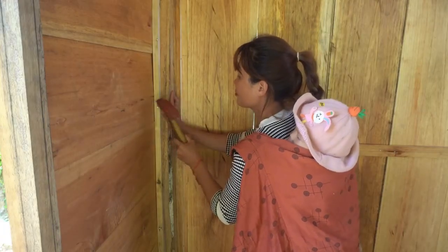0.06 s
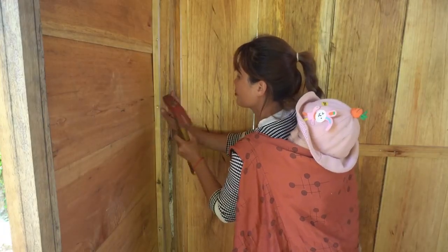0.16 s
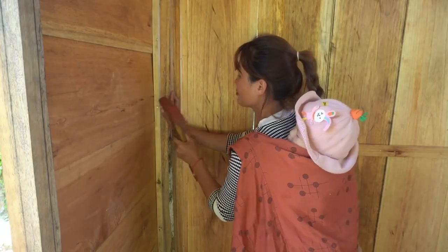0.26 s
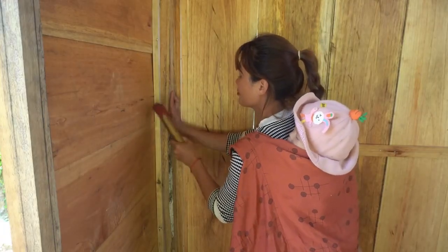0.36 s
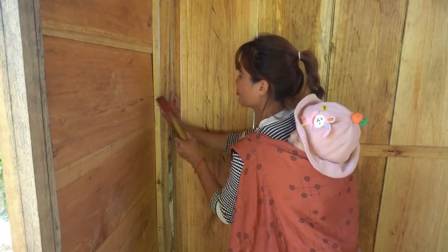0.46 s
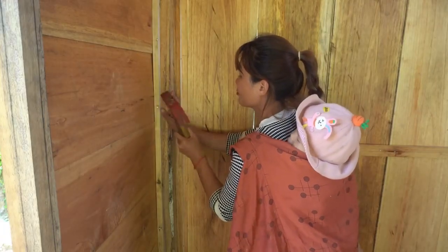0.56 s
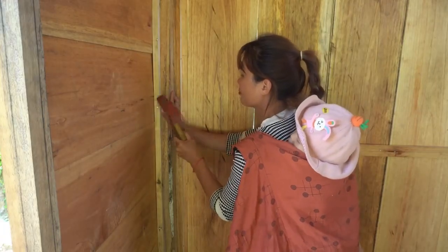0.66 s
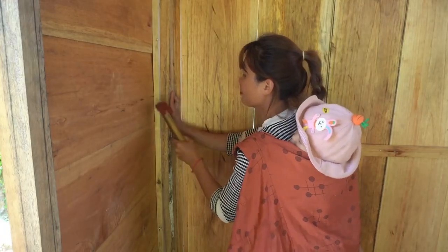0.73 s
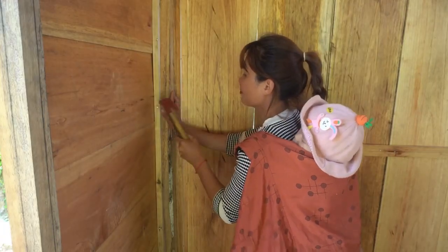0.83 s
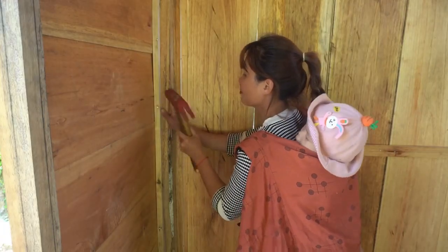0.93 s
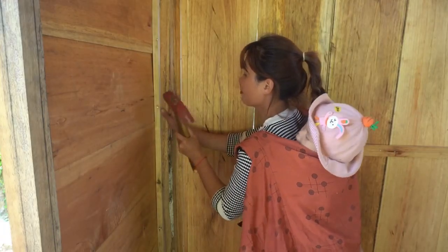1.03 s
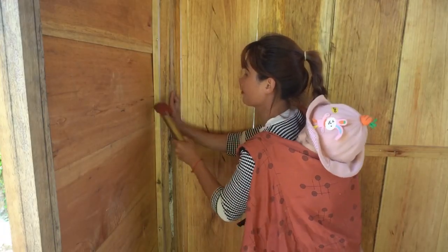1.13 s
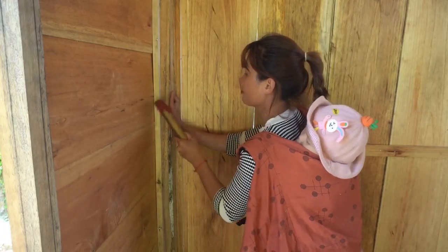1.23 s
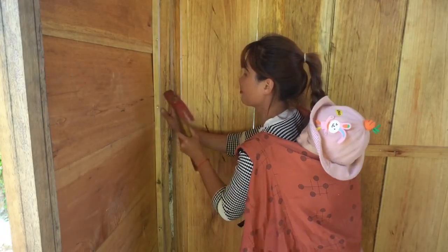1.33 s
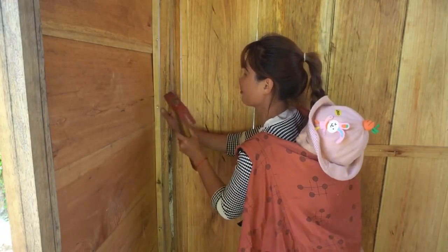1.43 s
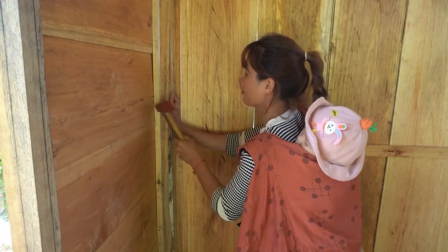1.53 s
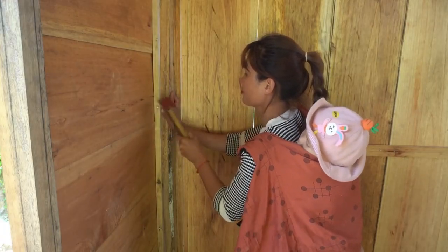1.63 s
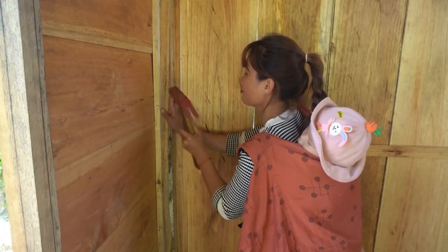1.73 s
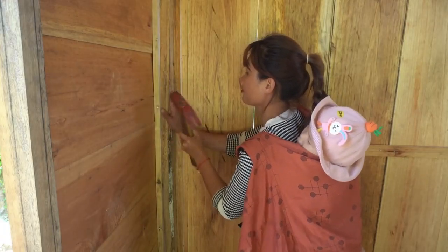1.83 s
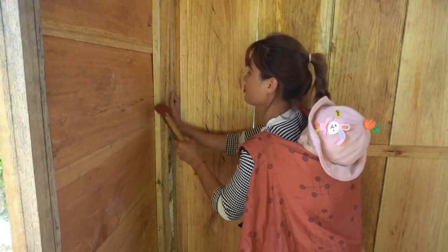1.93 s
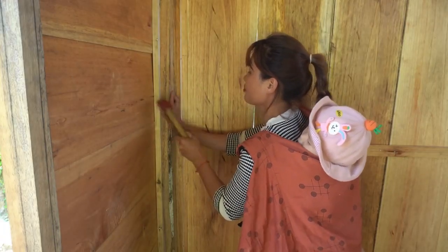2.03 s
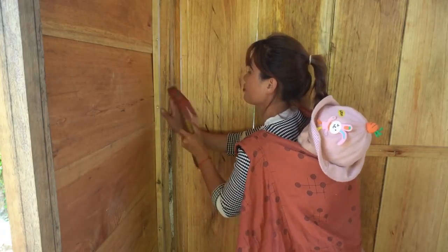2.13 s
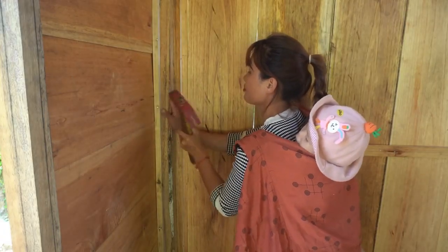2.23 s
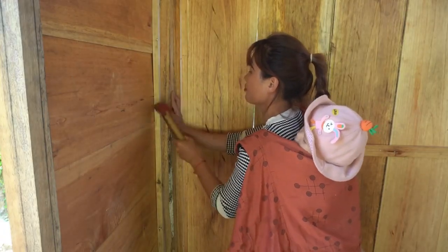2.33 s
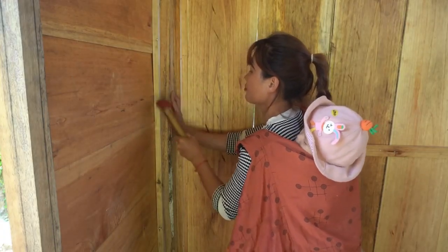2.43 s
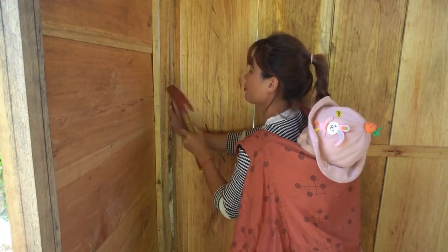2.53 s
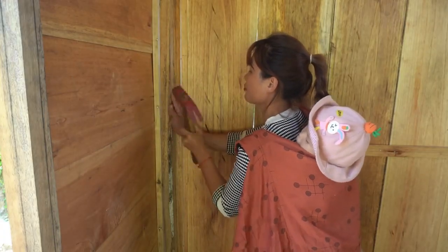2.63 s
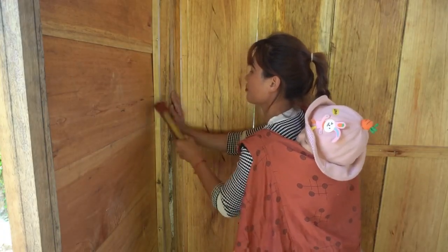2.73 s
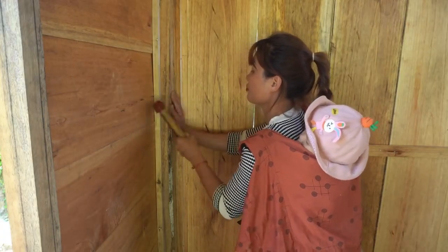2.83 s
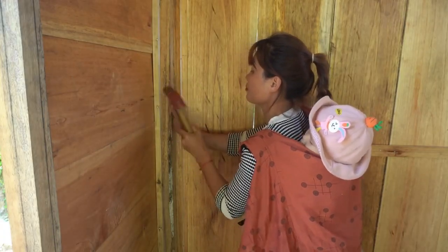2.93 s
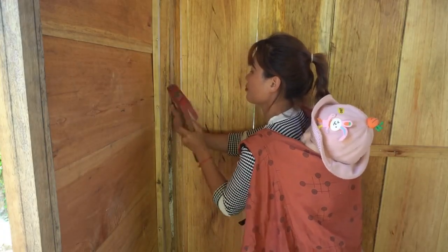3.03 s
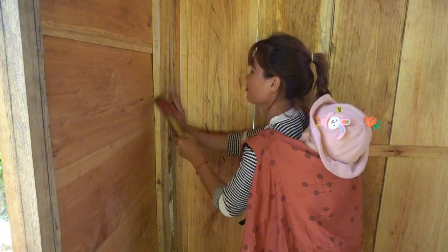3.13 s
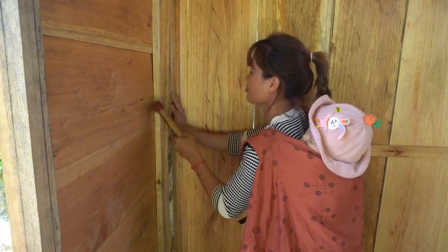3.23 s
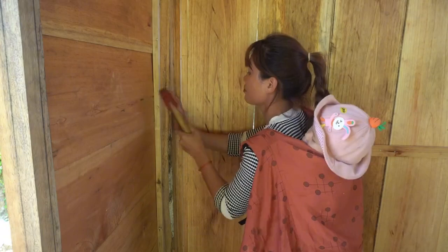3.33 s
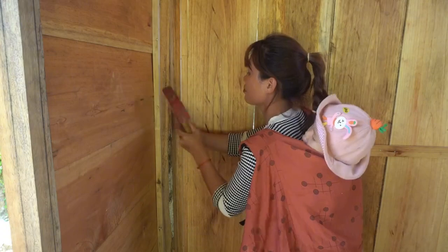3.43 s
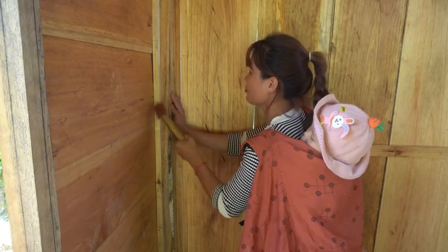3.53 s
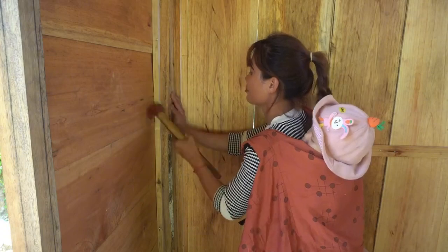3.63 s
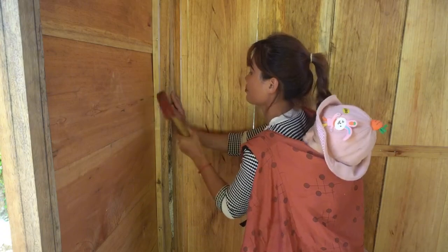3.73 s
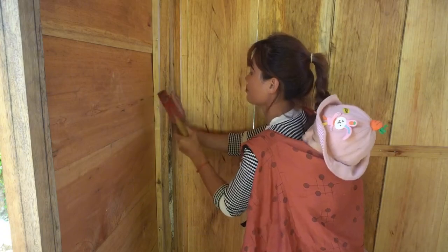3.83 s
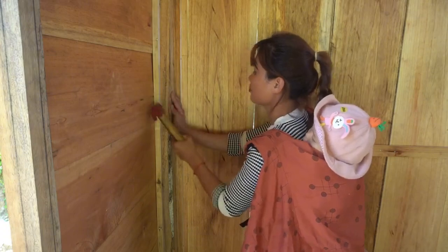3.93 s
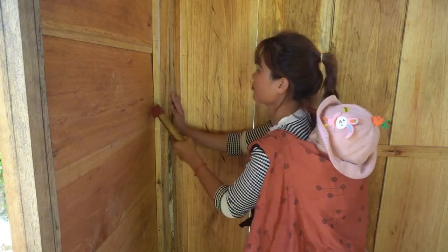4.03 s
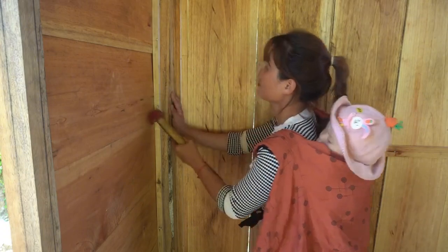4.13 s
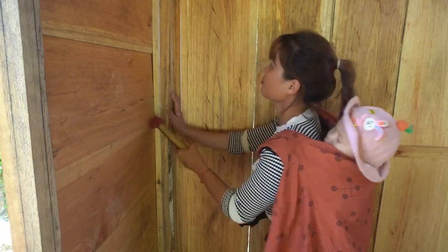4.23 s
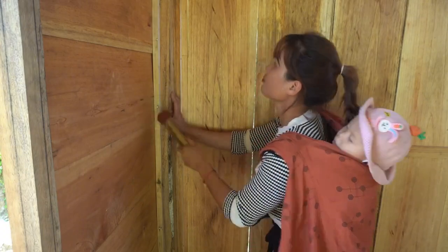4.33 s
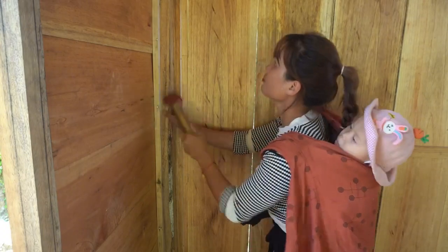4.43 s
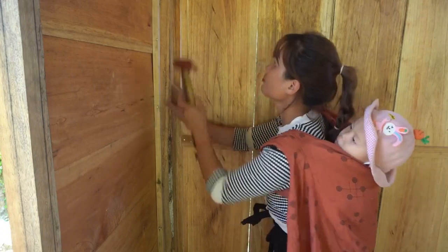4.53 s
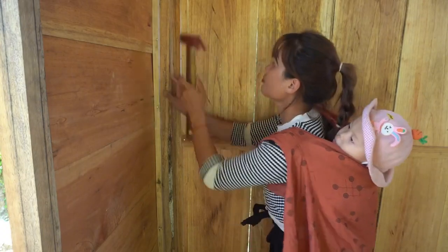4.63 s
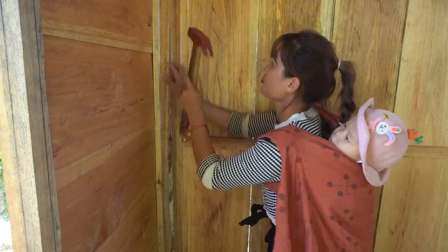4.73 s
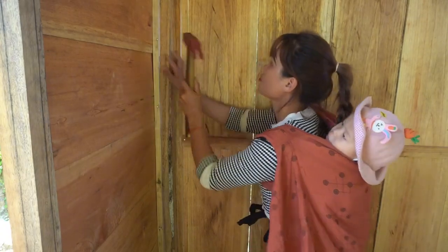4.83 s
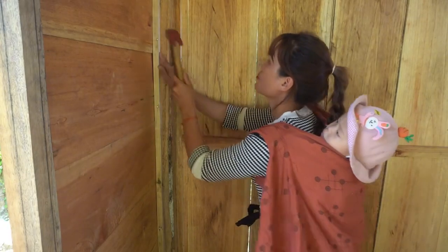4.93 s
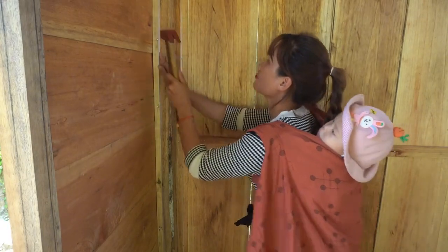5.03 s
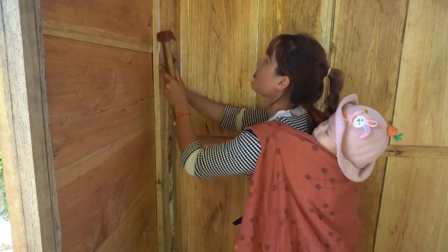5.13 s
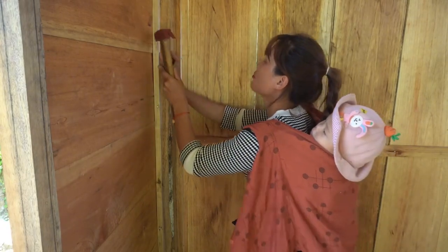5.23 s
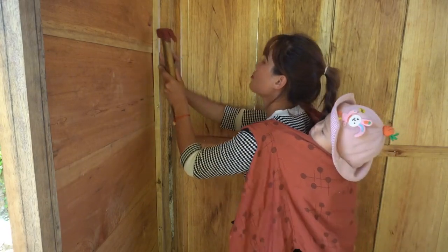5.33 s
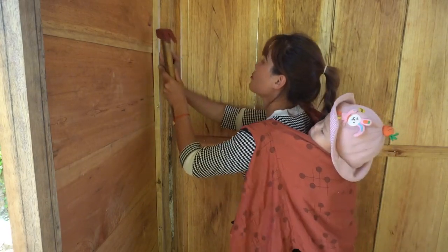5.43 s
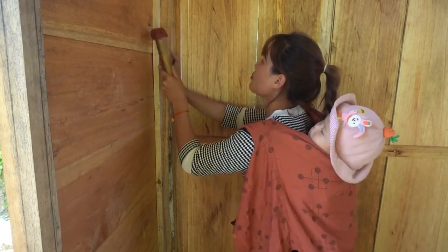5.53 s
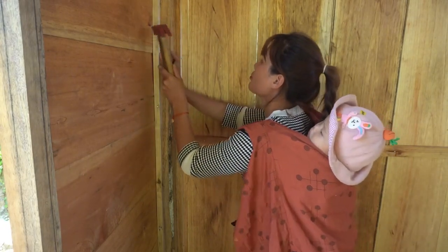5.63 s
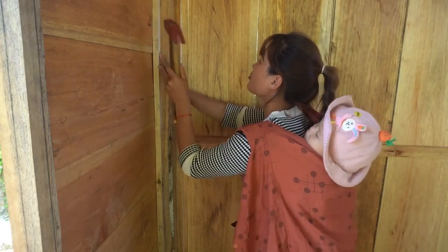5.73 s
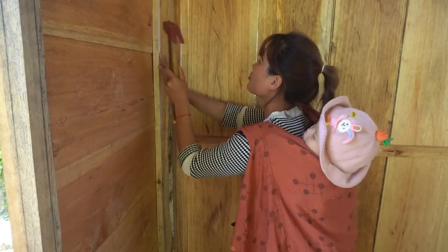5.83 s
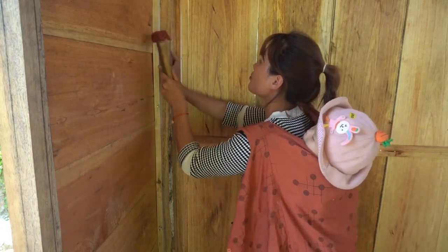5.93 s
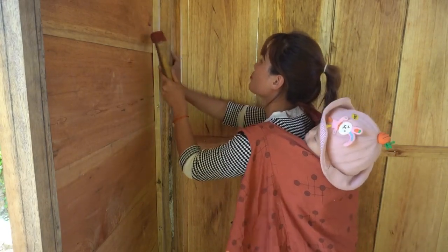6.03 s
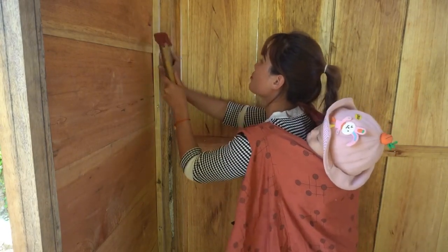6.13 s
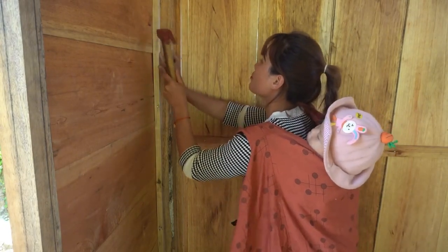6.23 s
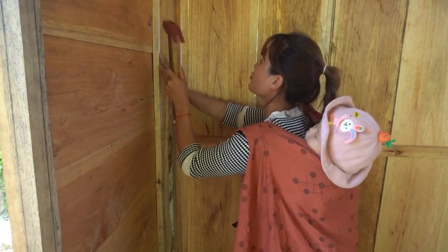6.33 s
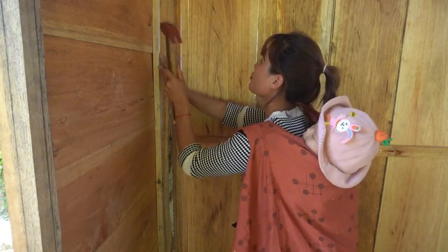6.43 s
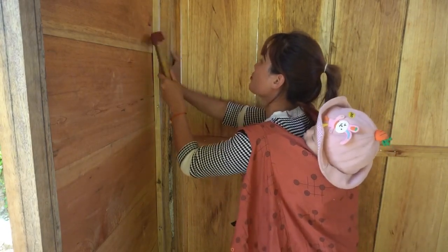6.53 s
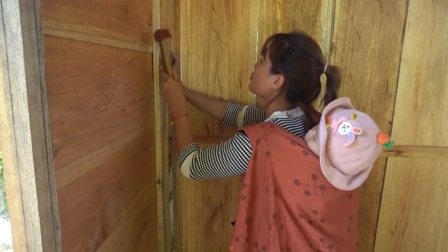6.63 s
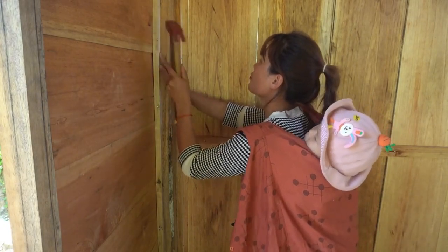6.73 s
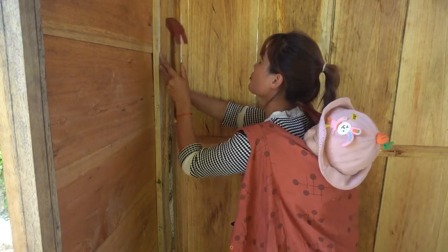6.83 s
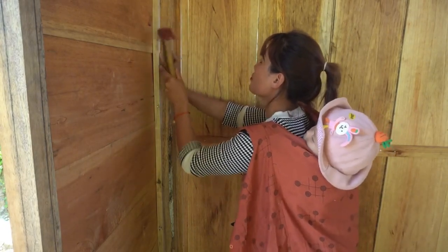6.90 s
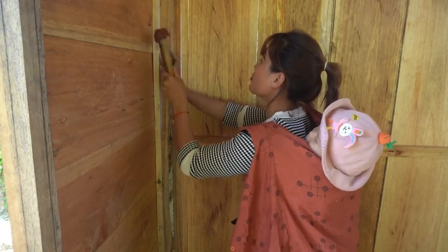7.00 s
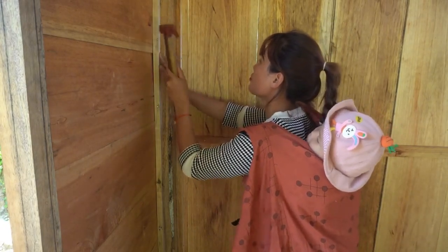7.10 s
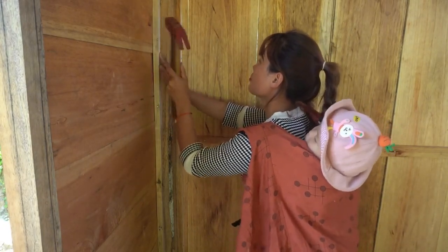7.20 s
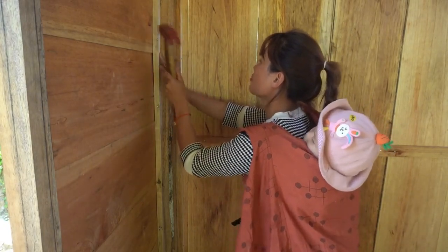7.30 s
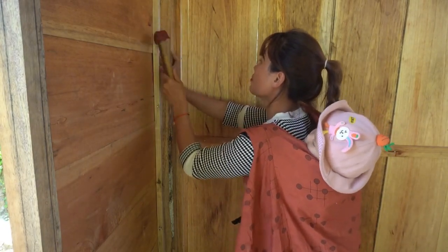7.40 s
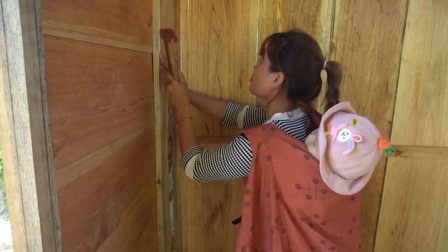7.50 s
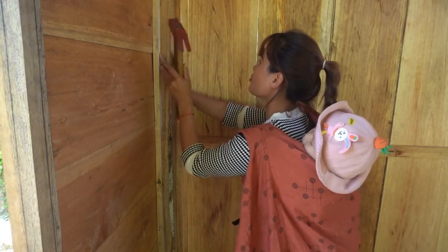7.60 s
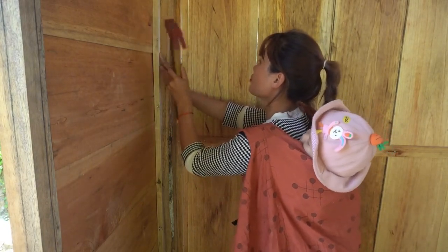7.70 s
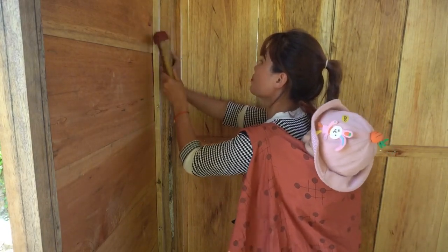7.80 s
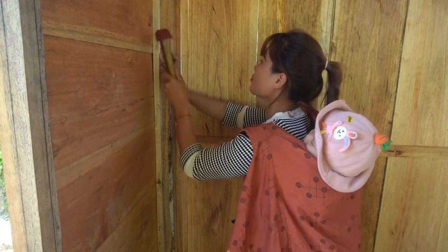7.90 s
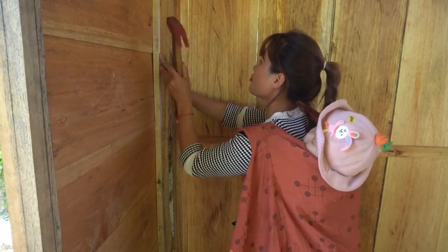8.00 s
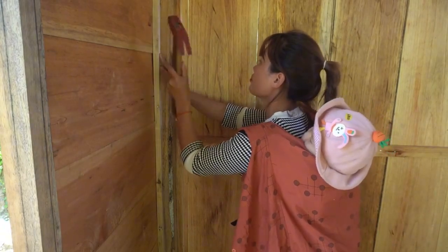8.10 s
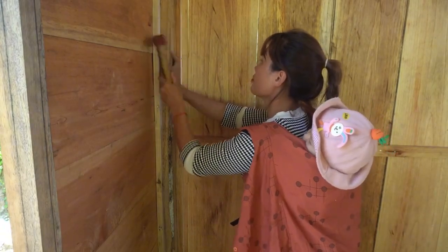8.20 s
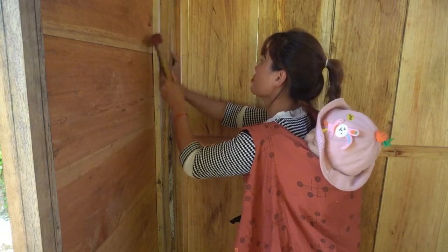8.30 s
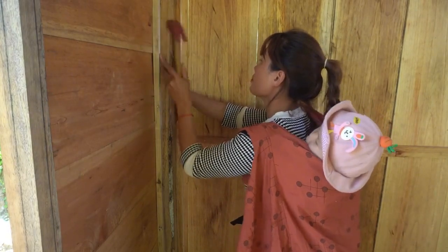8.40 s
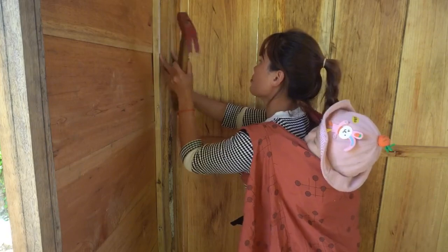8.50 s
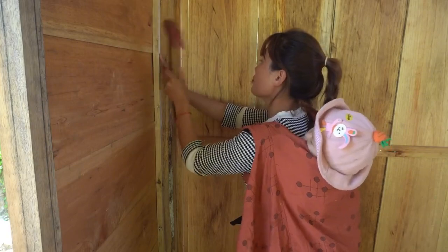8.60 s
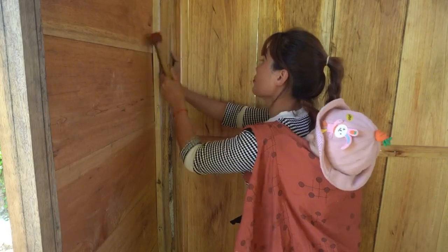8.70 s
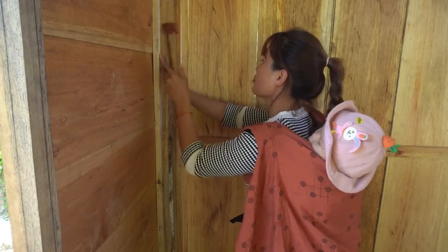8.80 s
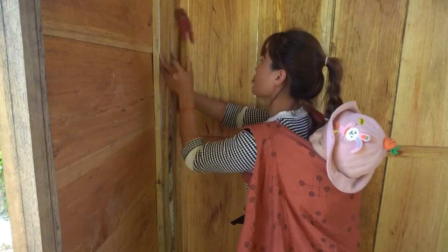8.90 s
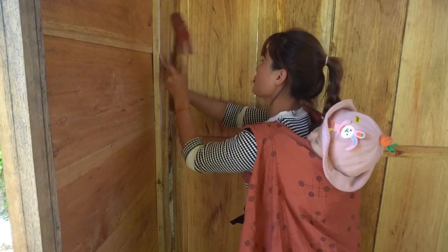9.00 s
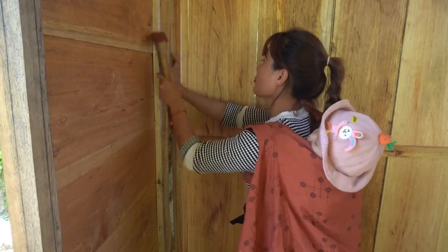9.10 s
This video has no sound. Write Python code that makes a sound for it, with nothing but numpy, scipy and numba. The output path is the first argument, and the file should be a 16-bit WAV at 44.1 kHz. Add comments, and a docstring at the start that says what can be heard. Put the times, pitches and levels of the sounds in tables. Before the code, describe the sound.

A hammer drives nails into a wooden strip on a plank wall, heard close in stereo inside an empty wooden house. From 0 to 4 seconds, firm blows fall about every 0.4 seconds: a sharp steel-on-nail crack, short woody knock, low board boom and brief boxy room answer, with faint high ringing from the hammer head. The blows near 2.8, 3.2 and 3.95 seconds bounce into a quick second hit. Soft low bumps follow at 4.1 and 4.25, then a near pause; a thin steel scrape comes at 4.9. At 5.2 a fresh, loose nail is struck, weaker, duller and rattling, firming by about 7. Blows continue every 0.4 to 0.6 seconds to just past 9, several rebounding, the last more thud than crack. A quiet water-like outdoor rush runs throughout, pushed down by loud hits, above barely audible low air rumble.

```python
"""A hammer drives nails into a strip on a plank wall inside an empty wooden house.
Steady blows come first: noise for the crack and the room, fading sine waves for strip, planks and steel head.
The hammer then bumps softly to rest, touches the steel, and strikes a fresh, loose nail that soon grips.
Some blows bounce and land again. Filtered noise makes a rush like running water outdoors all along.
An automatic gain control turns the sound down while it is loud."""
import sys
import numpy as np
from scipy import signal
from scipy.fft import rfft, irfft, next_fast_len
from scipy.io import wavfile
from scipy.ndimage import uniform_filter1d, map_coordinates
from numba import njit

SR = 44100
rng = np.random.default_rng(int(sys.argv[2]) if len(sys.argv) > 2 else 0)


def to_wav(sig):
    """Store sig (one row per channel, or 1-D mono) as 16-bit WAV at the path in sys.argv[1].

    Samples outside -1..1 are clipped; the rate is SR.
    """
    pcm = np.clip(np.atleast_2d(sig), -1, 1) * 32767
    pcm = np.round(pcm).astype(np.int16)
    wavfile.write(sys.argv[1], SR, pcm.T)  # frames by channels


N = 403515  # length in samples

# Swung blows. Each row: start in seconds, crack of steel on the nail in dB, answer of the wood in dB,
# ring of the hammer head in dB.
SWUNG_BLOWS = [(-0.055, -.5, -1.5, -49), (0.348, 0, -3.5, -45), (0.746, 0, -2.5, -30),
               (1.159, 0.5, -3, -35), (1.555, -1, -2, -31), (1.964, 0, -3, -37), (2.365, 1.5, 1.5, -23.5),
               (2.786, 5, 2.5, -22.5), (3.207, 1, -0.5, -33.5), (3.585, -0.5, 1.5, -57),
               (3.948, 2, 4.5, -43), (5.224, -5, -9.5, -60), (5.524, -3, -4.5, -55), (5.942, 1, -3, -55),
               (6.53, -2, -2.5, -50), (6.958, -2, 2.5, -39), (7.376, -1, 1.5, -41), (7.81, -7, 2.5, -24),
               (8.253, 0.5, 1.5, -29), (8.7, 1.5, 1, -26), (9.134, -20.5, 3.5, -35)]
# The head bounces and lands again. Each row: start in seconds, crack in dB, answer of the wood in dB.
SECOND_LANDINGS = [(2.809, -5, -5), (3.251, -8, -8.5), (4.002, 11, -1.5), (7.003, 2, -8.5),
                   (8.279, -1, -10), (8.725, 0, -7)]
# Light touches of the steel as the next nail is set. Each row: start in seconds, level in dB,
# time to the peak in seconds.
STEEL_TOUCHES = [(4.921, -23.5, 0.0014), (4.926, -23.5, 0.0055)]
# Soft bumps on the wall as the hammer comes to rest. Each row: start in seconds, level in dB.
SOFT_BUMPS = [(4.13, -28), (4.255, -35)]
# Tone colour of the crack. Each row: frequency in Hz, relative level per Hz in dB.
CRACK_COLOUR = [(180, -32), (300, -8), (772, -46), (1470, 5), (2740, 8.5), (3160, -58), (3830, 3),
                (10900, -11), (13800, -23)]
# Ways the nailed strip vibrates. Each row: central frequency in Hz, central level in dB,
# time to fall 60 dB in seconds.
STRIP_MODES = [(585, -8.5, 0.047), (713, -8, 0.17), (753, -21, 0.091), (812, 2, 0.032), (1023, -5.5, 0.092),
               (1140, -6.5, 0.14), (1228, 3.5, 0.037), (1406, -3, 0.1), (1427, -9.5, 0.16), (1798, 9, 0.06),
               (1990, 4, 0.097), (2174, 10, 0.033), (2777, -6, 0.13), (3060, -8, 0.084), (3634, -10, 0.053),
               (3660, -9.5, 0.2)]
# Low vibrations of wall and room. Each row: frequency in Hz, central level in dB,
# time to fall 60 dB in seconds, first swing of the boards as 1 or -1.
PLANK_MODES = [(59.7, -18, 1.15, 1), (73, -9, .75, 1), (78, -17, 1.05, 1), (89, -16, .78, -1),
               (95.9, -2, .25, -1), (108.3, -12, .8, -1), (120.8, -9, .75, 1), (128.8, -2, .45, -1),
               (145.2, -13, .6, -1), (171.3, -18, .45, 1), (188.2, -16, .5, -1), (205.5, -12, .5, -1),
               (231.4, -10, .28, 1), (251.5, -4, .22, 1), (275.1, -16, .32, -1), (289.8, -14, .3, 1)]
# Higher vibrations of single boards. Each row: frequency in Hz, central level in dB,
# time to fall 60 dB in seconds.
BOARD_MODES = [(155, -29, 1), (322.6, -9, 0.35), (441, -29, 0.6), (449, -3.5, 0.19), (527, -38, 0.3),
               (554, -16, 0.33)]
# Tone colour of the room's answer. Each row: frequency in Hz, relative level per Hz in dB.
ROOM_COLOUR = [(150, -2), (280, -4.5), (490, -6), (700, -2.5), (1000, 1), (1270, 4), (1560, -1.5),
               (2200, -4.5), (2760, -9), (5000, -16.5), (8000, -25.5), (12100, -30.5), (13100, -41)]
# How the near room dies. Each row: frequency in Hz, time to fall 60 dB in seconds,
# time constant of filling in seconds.
ROOM_DECAY = [(258, 0.3053, 0.038), (1050, 0.1757, 0.047), (2710, 0.2646, 0.0014), (6540, 0.2352, 0.011),
              (12700, 0.22, 0.012)]
# Stereo width of the hammer's noises and room. Each row: frequency in Hz, side minus middle in dB.
HAMMER_WIDTH = [(60, -52.5), (110, -61), (200, -85), (360, -22.5), (660, -13), (1210, -7), (2210, -6.5),
                (4020, -3), (7330, -0.5), (13400, -5)]
# Tone colour of a steel touch. Each row: frequency in Hz, relative level per Hz in dB.
TOUCH_COLOUR = [(350, -42), (600, -14), (1400, -6.5), (1750, -6), (2260, -1.5), (4190, -9.5), (13000, -39)]
# Tone colour of the outdoor rush. Each row: frequency in Hz, relative level per Hz in dB.
RUSH_COLOUR = [(15, 3), (40, -49), (75, -47.5), (150, -8.5), (400, -11.5), (662, 2.5), (885, 1),
               (1150, 0.5), (2170, -3), (2700, -8), (4440, -18), (5200, -24.5), (10900, -37), (13000, -46)]
# Stereo width of the rush. Each row: frequency in Hz, side minus middle in dB.
RUSH_WIDTH = [(60, 15.5), (110, -25), (200, -28), (360, -1.5), (660, -14), (1210, -4), (2210, -4.5),
              (4020, -1.5), (7330, 2), (13400, -4)]
# Loudness of the rush over time. Each row: time in seconds, level in dB.
RUSH_LOUDNESS = [(0.0, -40.5), (0.53, -43), (4.3, -47), (5.09, -42), (5.43, -44.5), (8.2, -43),
                 (9.15, -41.5)]
# Air stirring at the microphone. Each row: frequency in Hz, relative level per Hz in dB.
RUMBLE_COLOUR = [(10, -18), (30, 0), (50, 0), (80, -23)]

HEAD_HZ, HEAD_T60 = 6562, 0.41  # ring of the steel head: Hz, seconds to fall 60 dB
HEAD_WAVER_DB, HEAD_WAVER_S = 5, 0.0202  # the ring flutters in the hand: depth, spacing of random points
KNOCK_DB, BOOM_DB = -14.5, -8  # strip against the wood's answer; boom of a full blow on a firm, lower nail
BODY_DB, BRIGHT_DB = 6.5, 1.12  # firm full blow: dB per octave under and over 1.5 kHz
NEW_NAIL_S, GRIP_S = 5.224, 0.71  # first blow on the fresh nail; time constant with which it grips
LOOSE_KNOCK_DB, LOOSE_BOOM_DB = 13, -15.5  # what a wholly loose nail adds
LOOSE_BODY_DB, LOOSE_BRIGHT_DB = -1.5, -8  # the same for colour, dB per octave
UPPER_BOOM_DB = 1.5  # the fresh nail sits higher, where the wall swings more freely
REBOUND_BODY_DB, REBOUND_BRIGHT_DB = 9, -7.5  # dB per octave
REBOUND_KNOCK_DB, REBOUND_BOOM_DB = -2, -8  # against the wood's answer
TOP_HZ = 14000  # nothing is left from here up


def hammer():
    """All blows, second landings, steel touches and soft bumps, each set in its place in time."""
    t = np.arange(SR) / SR
    events = [(start, full_blow(start, *levels)) for start, *levels in SWUNG_BLOWS]
    events += [(start, rebound(*levels)) for start, *levels in SECOND_LANDINGS]
    events += [(start, touch(*settings)) for start, *settings in STEEL_TOUCHES]
    events += [(start, amp(db) * np.tile(planks(t), reps=(2, 1))) for start, db in SOFT_BUMPS]
    return place(events)


def full_blow(start, crack_db, wood_db, ring_db):
    """A swung blow; on a loose nail the strip rattles, the wall booms less and the sound is dull."""
    upper = start > NEW_NAIL_S - .1
    loose = np.exp(-(start - NEW_NAIL_S) / GRIP_S) * upper  # 1 is loose, 0 is firm
    knock_db = wood_db + KNOCK_DB + loose * LOOSE_KNOCK_DB
    boom_db = BOOM_DB + upper * UPPER_BOOM_DB + loose * LOOSE_BOOM_DB
    body_db = BODY_DB + loose * LOOSE_BODY_DB
    bright_db = BRIGHT_DB + loose * LOOSE_BRIGHT_DB
    return blow(crack_db, knock_db, boom_db, wood_db, body_db, bright_db) + head(ring_db)


def rebound(crack_db, wood_db):
    """A second landing, dull and woody: the treble is weak and the low tones are strong."""
    knock_db, boom_db = wood_db + REBOUND_KNOCK_DB, wood_db + REBOUND_BOOM_DB
    return blow(crack_db, knock_db, boom_db, wood_db, REBOUND_BODY_DB, REBOUND_BRIGHT_DB)


def blow(crack_db, knock_db, boom_db, room_db, body_db, bright_db):
    """Crack of steel on the nail, knock of the strip, boom of the wall and answer of the room."""
    t = np.arange(SR) / SR
    crack = amp(crack_db - 60 * t / .012) * noise(SR, CRACK_COLOUR, HAMMER_WIDTH, body_db, bright_db)
    knock = amp(knock_db) * strip(t, body_db, bright_db)
    boom = amp(boom_db) * planks(t)
    room_noise = noise(SR, ROOM_COLOUR, HAMMER_WIDTH, body_db, bright_db)
    room = amp(room_db) * fading(room_noise, far_db=-37.0)
    contact = 1 - np.exp(-(t / .001) ** 3)  # the sound sets in over about a millisecond
    # the push itself, a few quick swings
    push_shape = np.exp(-((t - .0014) / 0.0011) ** 2)
    push = amp(crack_db - 3.0) * push_shape * np.sin(2 * np.pi * 1400 * t)
    return push + contact * (crack + knock + room + boom)


def strip(t, body_db, bright_db):
    """The strip vibrates at many pitches that die away, a little different at each blow."""
    hz, db, t60 = np.transpose(STRIP_MODES)[:, :, None]
    detune, scatter = rng.standard_normal((2, len(hz), 1))
    level = amp(db + lean(hz, body_db, bright_db) + 3.5 * scatter - 60 * t / t60)
    return (level * np.sin(2 * np.pi * hz * (1 + 0.0183 * detune) * t)).sum(0)


def planks(t):
    """The planks first swing the same way at every blow, so the boom beats in much the same pattern."""
    boards = [(*mode, (-1) ** k) for k, mode in enumerate(BOARD_MODES)]  # swings alternate
    hz, db, t60, swing = np.transpose(list(PLANK_MODES) + boards)[:, :, None]
    scatter_db = .8 * rng.standard_normal(hz.shape)
    level = swing * amp(db + scatter_db - 60 * t / t60)
    late = np.maximum(t - .002, 0)  # the swing starts 2 ms after the blow
    rise = 1 - np.exp(-t / .016)
    return (level * np.sin(2 * np.pi * hz * late)).sum(0) * rise


def head(ring_db):
    """The steel head rings; two close modes beat, so the ring swells late, and it flutters."""
    t = np.arange(SR) / SR
    waver = map_coordinates(rng.standard_normal(200), [t / HEAD_WAVER_S])
    level = amp(ring_db - 60 * t / HEAD_T60 + HEAD_WAVER_DB * waver)
    beat = np.sin(np.pi * 1.8 * t)  # modes 1.8 Hz apart
    return level * beat * np.sin(2 * np.pi * HEAD_HZ * t)


def touch(db, peak_s):
    """A thin, bright scrape that swells and fades, and its echo in the room."""
    u = np.arange(SR) / SR / peak_s
    scrape = u * np.exp(1 - u) * noise(SR, TOUCH_COLOUR, HAMMER_WIDTH)
    echo = amp(-11.5) * fading(noise(SR, TOUCH_COLOUR, HAMMER_WIDTH), far_db=-45)
    return amp(db) * (scrape + echo)


def fading(x, far_db):
    """Each pitch fills the room and dies in lumps, ever faster; the rest of the house answers weak and long."""
    hz, t, z = signal.stft(x, SR, nperseg=256)
    t60 = along(ROOM_DECAY, hz)[:, None]
    fill = along(ROOM_DECAY, hz, column=2)[:, None]
    lumps = smooth_field(z.shape[1:], hz_bins=8, frames=2)
    near = amp(-60 * (t / t60) ** 1.4)
    far = amp(far_db - 60 * t / (4.3 * t60))
    shape = (1 - np.exp(-t / fill)) * (near + far)
    return signal.istft(z * shape * amp(1.6 * lumps), SR, nperseg=256)[1][:, :x.shape[1]]


def rush():
    """A slightly patchy rush from outdoors: coloured noise whose pitches waver in strength."""
    z = signal.stft(noise(N, RUSH_COLOUR, RUSH_WIDTH), nperseg=512)[2]
    patches = smooth_field(z.shape[1:], hz_bins=6, frames=10)
    patchy = signal.istft(z * amp(1.5 * patches), nperseg=512)[1][:, :N]
    seconds, db = np.transpose(RUSH_LOUDNESS)
    return amp(np.interp(np.arange(N) / SR, seconds, db)) * unit(patchy)


def rumble():
    """Faint low noise of air stirring at the microphone, almost the same on both sides."""
    return amp(-60.5) * noise(N, [*RUMBLE_COLOUR, (200, -90)], [(30, -69)])


def amp(db):
    """Turns a level in dB into a multiplying factor."""
    return 10 ** (np.asarray(db) / 20)


def unit(x):
    """Scales a sound to an average strength (rms) of 1."""
    return x / np.sqrt(np.mean(x ** 2) + 1e-20)


def along(points, hz, column=1):
    """Reads one column of a table between its frequencies, on a logarithmic scale."""
    table = np.transpose(points)
    return np.interp(np.log(hz + 1), np.log(table[0] + 1), table[int(column)])


def lean(hz, body_db, bright_db):
    """Colour of one blow in dB: a slope below 1.5 kHz and a slope above."""
    octaves = np.log2(np.clip(hz, 600, 14000) / 1500)
    return np.where(octaves < 0, -body_db, bright_db) * octaves


def filtered(x, response):
    """Strengthens or weakens each frequency of x by the given response."""
    m = next_fast_len(x.shape[-1] + 8192)
    spectrum = rfft(x, m) * response(np.fft.rfftfreq(m, 1 / SR))
    return irfft(spectrum, m)[..., :x.shape[-1]]


def noise(size, spectrum, width, body_db=0, bright_db=0):
    """Coloured stereo noise of rms 1: a shared middle plus a side that is opposite in the two ears."""
    def response(hz):
        colour = amp(along(spectrum, hz) + lean(hz, body_db, bright_db))
        return colour * [np.ones_like(hz), amp(along(width, hz))]
    mid, side = filtered(rng.standard_normal((2, size)), response)
    return unit(np.array([mid + side, mid - side]))


def smooth_field(shape, hz_bins, frames):
    """Random lumps over frequency and time, smoothed both ways and scaled to rms 1."""
    over_hz = uniform_filter1d(rng.standard_normal(shape), size=hz_bins, axis=0)
    return unit(uniform_filter1d(over_hz, size=frames, axis=1))


def place(events):
    """Adds up one-second stereo sounds at their starts; one may start before time zero."""
    out = np.zeros((2, N + 2 * SR))  # a spare second at each end
    for start, sound in events:
        first = round(start * SR) + SR
        out[:, first:first + SR] += sound
    return out[:, SR:N + SR]


def scene():
    """The hammer indoors and the rush from outdoors."""
    return hammer() + rush()


@njit
def follow(level, rise, fall):
    """Follows the peaks: climbs fast and sinks slowly."""
    out, now = np.empty_like(level), 0.
    for i in range(len(level)):
        now += (level[i] - now) * (rise if level[i] > now else fall)
        out[i] = now
    return out


def gain_control(x, knee_db=-21, slope=0.6, attack=.0025, release=0.059):
    """Turns both channels down together above the knee; the first milliseconds of a blow slip through."""
    level = follow(np.abs(x).max(0), 1 / (attack * SR), 1 / (release * SR))  # attack and release in seconds
    return x * np.maximum(level / amp(knee_db), 1) ** -np.clip(slope, 0, 1)


def bass_cut(hz):
    """Weakens the deep tones below about 48 Hz."""
    return (1j * hz) ** 2 / ((1j * hz) ** 2 + 1.4j * hz * 48 + 48 ** 2)


def band_limit(hz):
    """Lowers the top treble by 14 dB from 13 to 13.3 kHz and removes everything from TOP_HZ up."""
    return amp(np.interp(hz, [13000, 13300], [0, -14])) * (hz < TOP_HZ)


def record(dry):
    """Gain control, soft rounding of the peaks, a bass cut, faint rumble and the band limit."""
    ducked = gain_control(dry)
    clipped = ducked / (1 + np.abs(ducked / .95) ** 4) ** .25
    return filtered(filtered(clipped, bass_cut) + rumble(), band_limit)


dry = scene()
out = record(dry)
to_wav(out)
```